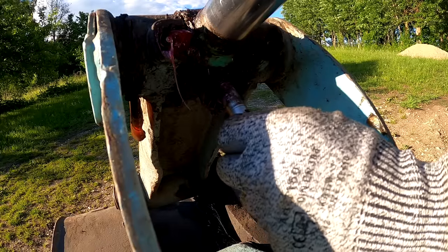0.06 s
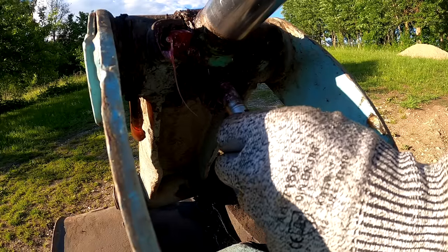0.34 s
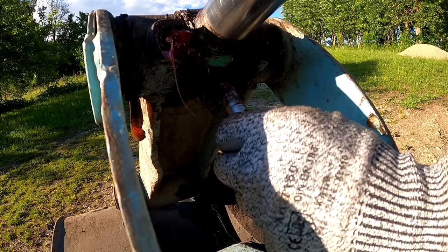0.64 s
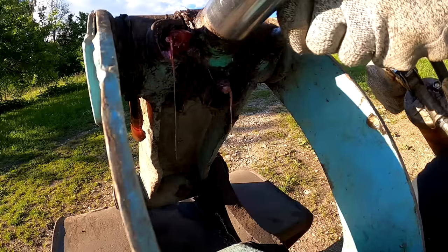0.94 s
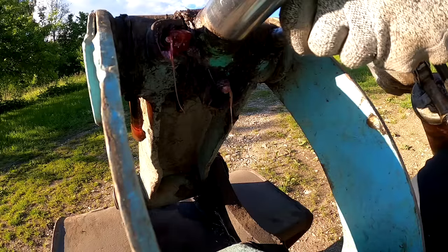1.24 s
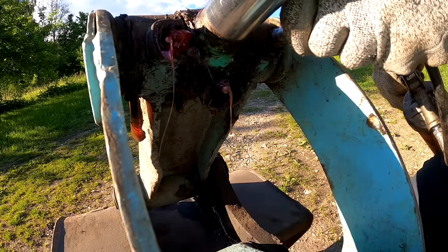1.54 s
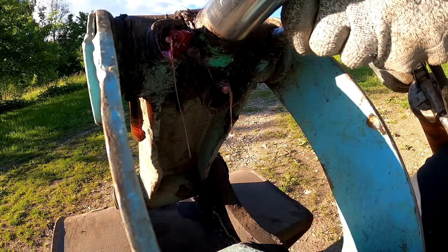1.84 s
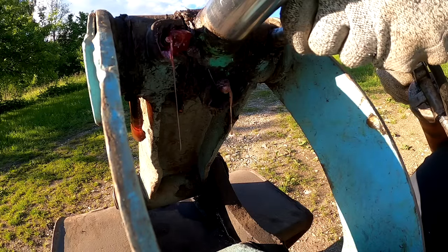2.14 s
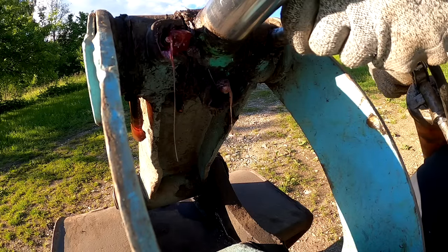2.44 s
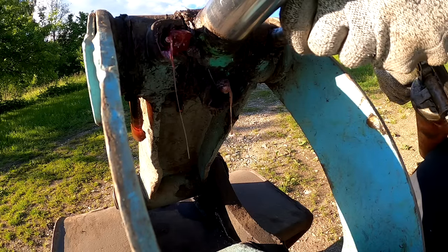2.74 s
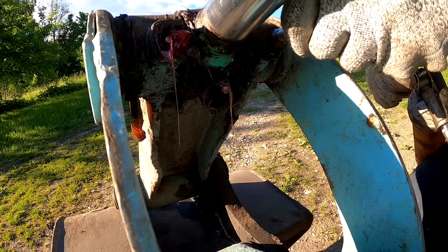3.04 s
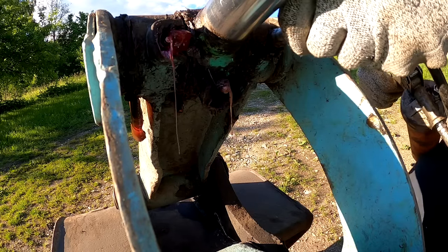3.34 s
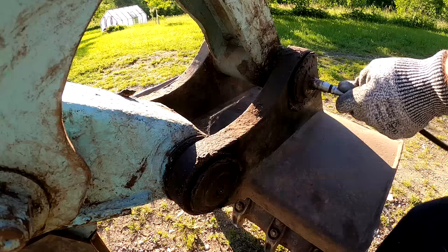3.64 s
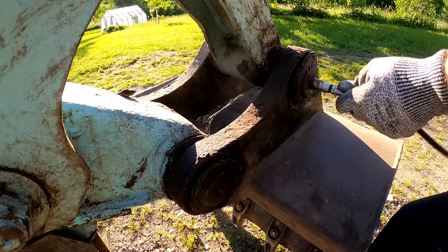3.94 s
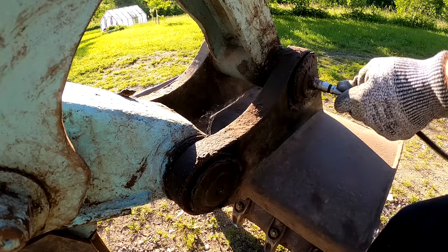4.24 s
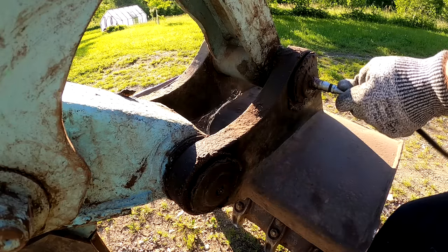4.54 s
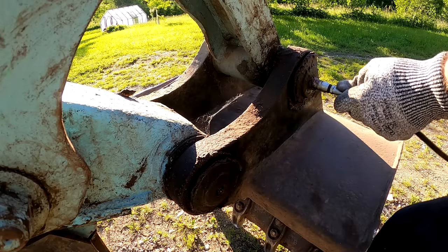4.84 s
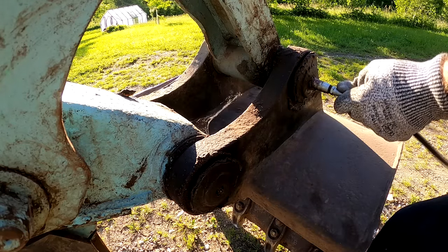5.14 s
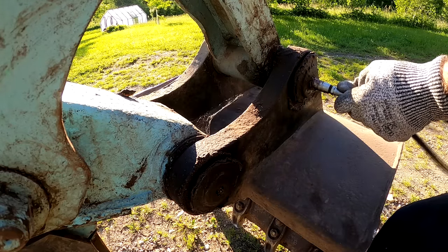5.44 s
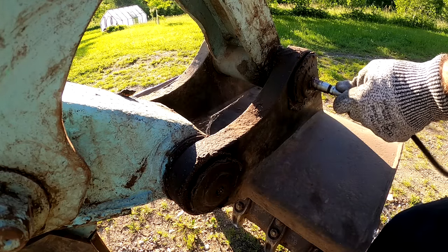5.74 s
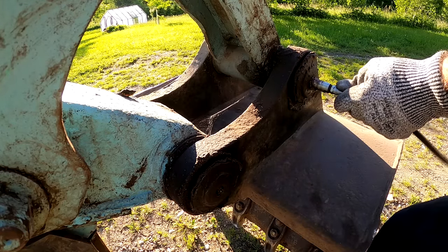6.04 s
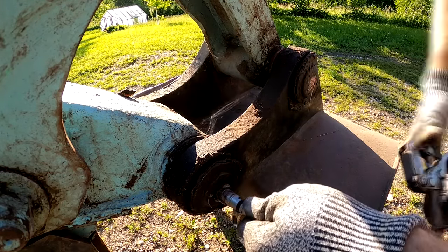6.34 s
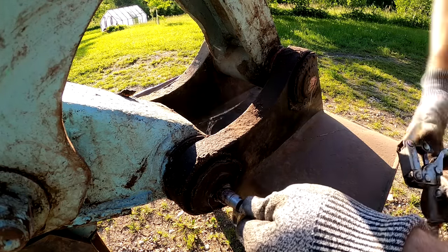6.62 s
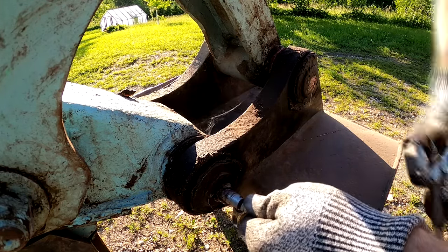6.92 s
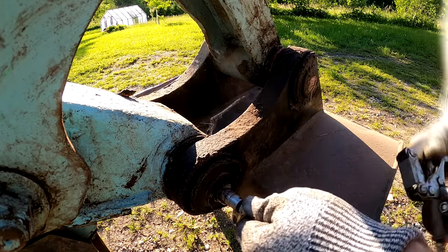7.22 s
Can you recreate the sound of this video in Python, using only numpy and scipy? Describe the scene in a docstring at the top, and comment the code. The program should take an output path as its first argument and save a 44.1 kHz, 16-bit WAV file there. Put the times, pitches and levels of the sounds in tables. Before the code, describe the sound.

Close metallic clicks of a pumped grease gun speed up, while birds trill in the trees and a breeze softly thumps the microphone.

```python
"""Outdoors beside a digger arm, light wind buffets the microphone over a faint rustle of leaves. Close by, a
grease gun's coupler knocks, its hose and a knit glove rub, and slow strokes begin, lever and piston clacking
and ringing the steel. From the trees a bunting sings a row of trilled notes and one long buzz. The strokes turn
quick and a second bunting sings from farther off. Another distant bird twitters, a low thump lands on the
microphone, and the far bunting sings once more."""
import sys
import numpy as np
from scipy import signal
from scipy.fft import rfft, irfft, next_fast_len
from scipy.io import wavfile
from scipy.ndimage import uniform_filter1d, map_coordinates

SR = 44100
rng = np.random.default_rng(int(sys.argv[2]) if len(sys.argv) > 2 else 0)


def waveform_to_disk(signal):
    """Save audio, clipped to [-1, 1], as 16-bit WAV at the path in sys.argv[1]."""
    frames = np.transpose(np.atleast_2d(signal))
    scaled = np.clip(frames, -1, 1) * 32767
    samples = np.round(scaled).astype(np.int16)
    wavfile.write(sys.argv[1], SR, samples)


N = 321048

# The breeze on the microphone. Each row: time in seconds, buffet level in dB.
BREEZE_LEVELS = [(0, -68), (0.8, -57), (1.55, -55.5), (1.9, -63), (2.15, -52), (2.4, -60.5), (2.6, -52.5),
                 (3.1, -55), (3.66, -54), (3.76, -74.5), (6.3, -75), (6.42, -54.5), (7.28, -61)]
# Low thumps on the microphone, from a gust or a bump of the camera. Each row: peak time in seconds,
# deep buffet in dB, lean to the left in dB (scaled by PAN_SHARE), the thump's upper part in dB.
LOW_THUMPS = [(0.869, -48, 1, -63), (1.477, -43.5, -17, -68), (1.599, -42, -19, -60),
              (2.527, -50.5, -8.5, -63), (3.039, -43, -4, -61), (3.158, -44, -9, -63),
              (3.618, -34.5, -16, -44.5), (3.659, -42, -1, -49), (4.999, -52, 3, -63), (6.376, -29, 2, -43),
              (6.579, -46, 6, -51.5), (6.799, -48, 11, -63.5), (6.965, -42.5, 14, -51),
              (7.084, -42, 20, -52.5)]
THUMP_RISE_S, THUMP_FALL_S, PAN_SHARE = 0.019, 0.027, 0.64
# The air all around. Each row: time in seconds, low rush in dB, leaves in dB.
AIR_LEVELS = [(0.0, -63.5, -65.5), (0.56, -64.5, -67), (0.97, -65, -70), (1.32, -57.5, -65),
              (1.84, -65.5, -67.5), (2.21, -61.5, -65), (2.66, -61.5, -62.5), (3.0, -62.5, -65.5),
              (3.57, -63, -67.5), (3.85, -68.5, -71.5), (5.07, -71, -71), (5.52, -71, -72.5),
              (6.2, -69.5, -65.5), (6.37, -67, -72), (7.02, -70, -74.5), (7.28, -71.5, -74)]
# Deep buffet, a thump's upper part, low rush and leaves. Each row: frequency in Hz, noise density in dB.
BUFFET_SPECTRUM = [(10, -6.5), (28, 2.5), (55, 0), (85, -7.5), (130, -16), (200, -26.5), (300, -33),
                   (900, -96.5)]
THUMP_SPECTRUM = [(60, -15), (120, 3.5), (200, -8.5), (350, -23.5), (900, -72)]
RUSH_SPECTRUM = [(40, -12), (130, -1), (220, 1), (330, -5), (500, -14.5), (800, -21.5), (2000, -67)]
LEAF_SPECTRUM = [(250, -24.5), (550, -7.5), (800, -11.5), (1150, 0.5), (1600, -2), (2050, 1), (2600, -2.5),
                 (4500, -3.5), (7300, -11.5), (8600, -20.5), (9900, -54), (13000, -60)]
# Stereo width of the leaves. Each row: frequency in Hz, left-right likeness from 0 to 1.
LEAF_LIKENESS = [(100, 0.24), (1500, 0.39), (3000, 0.6), (5000, 0.58), (9000, .1)]
# The echo from the trees. Each row: frequency in Hz, seconds to fall by 60 dB.
TREE_DECAY = [(300, 0.12), (2000, 0.17), (5000, 0.36), (10000, 0.11)]

# Modes of the gun, and of its hollow barrel under a soft press.
# Each row: frequency in Hz, width in Hz, strength in dB.
GUN_MODES = [(340, 71, -13), (670, 78, -22.5), (1050, 151, -4), (1435, 263, -4), (1664, 165, 1),
             (1997, 155, 3), (2385, 78, 2), (2613, 290, -3), (3300, 500, -1.5), (3773, 300, 3.5),
             (4130, 580, -3), (5130, 630, -3.5), (6580, 1480, -8.5), (8710, 1500, -7.5),
             (10700, 1100, -31.5)]
BARREL_MODES = [(1325, 65, 12), (1850, 130, 8), (2800, 400, -2)]
# Knocks of coupler and body. Each row: start in seconds, level in dB, thud and ring in dB above that.
COUPLER_KNOCKS = [(0.119, -59, -1, 7), (0.2685, -58.5, -3.5, -1.5), (0.4027, -62.5, -8, 4),
                  (0.702, -59.5, -1.5, 9), (1.3625, -49.5, -18, -11), (1.374, -52.5, -2, -2),
                  (1.432, -69, 5, 5.5), (1.622, -39.5, -6.5, 2.5), (2.126, -41.5, -9, -2.5),
                  (3.3522, -28, -8.5, -9), (3.361, -46, -5.5, 5.5), (3.4474, -52, -16, -3.5),
                  (3.6727, -49, 4.5, 0), (3.6784, -46, 1.5, -3.5), (6.388, -55.5, -1, -1),
                  (6.928, -45.5, -11, 1.5)]
EDGE_PER_RING = 1.27  # a contact's top edge grows faster than its steel ring
# The hose being pushed on, and two slides of the glove. Each row: time in seconds, level in dB.
HOSE_LEVELS = [(0.23, -67), (0.27, -55.5), (0.33, -61.5), (0.45, -68), (0.62, -64.5), (0.85, -70.5)]
GLOVE_SLIDES = [
    [(1.06, -73), (1.14, -64), (1.25, -78), (1.34, -63.5), (1.47, -79), (1.6, -68), (1.75, -68)],
    [(6.45, -85), (6.6, -67), (6.74, -64.5), (6.85, -72)],
]
# Rubbing rubber and rubbing knit. Each row: frequency in Hz, noise density in dB.
RUBBER_SPECTRUM = [(150, -50), (400, 3.5), (900, -7), (1600, 1), (1900, -8), (4000, -12), (8000, -55)]
KNIT_SPECTRUM = [(1500, -19), (3500, -5), (6000, 1.5), (7500, -8.5), (9500, -13), (10800, -41)]
# Slow, full strokes. Each row: closing time in seconds, level in dB, seconds until the rebound,
# its level in dB, seconds until the lever springs open, its level in dB.
SLOW_PUMPS = [(1.1773, -39.5, 0.017, -46.5, 0.24, -53), (1.7215, -42.5, 0.024, -56.5, 0.22, -55),
              (2.2346, -40.5, .0221, -50, .2418, -54.5), (2.773, -43.5, .0192, -45, .249, -54),
              (3.3291, -42, 0.027, -43.5, 0.26, -54.5)]
# The colour of each kind of contact: thud, ring and edge in dB above its level.
CLOSING, REBOUND, OPENING = (-10, 6.5, -4.5), (-14, 7.6, -32), (1.2, 10.3, -1.5)
PRESSING = (-16, -5.5, -33)

# The buzz closing each of the three bunting songs, near and far. Each row: time in seconds, level in dB.
BUZZ_PHRASES = [
    [(3.12, -71), (3.2, -55.5), (3.27, -50.5), (3.36, -57), (3.45, -59.5), (3.56, -59), (3.67, -78)],
    [(5.56, -77), (5.62, -69), (5.7, -75)],
    [(6.93, -62), (6.98, -69), (7.05, -89)],
]
# The wheeze in that buzz. Each row: frequency in Hz, noise density in dB.
WHEEZE_SPECTRUM = [(3800, -39), (4700, -27), (5200, 3.5), (5720, 9), (6400, 4), (6750, -27), (7600, -18),
                   (9000, -53)]
# The piston's soft double presses. Each row: start in seconds, first level in dB, second level in dB.
PISTON_PRESSES = [(3.8677, -55.5, -53), (3.997, -52.5, -52.5), (4.109, -57, -45.5), (4.38, -57.5, -55),
                  (4.5047, -79, -50.5), (4.664, -60.5, -54.5), (4.812, -56, -76), (4.96, -53.5, -58),
                  (5.109, -51.5, -56), (5.2511, -53, -63), (5.521, -56, -52.5), (5.8344, -47.5, -57),
                  (6.1582, -55.5, -50.5)]
# Double clacks of the quick strokes. Each row: start in seconds, first level in dB,
# seconds to the second clack, its level in dB, ring in dB for a clack of usual force.
QUICK_CLACKS = [(3.7502, -47.5, .012, -46, 2), (3.8975, -48, 0.0087, -50.5, -2),
                (4.137, -50.5, 0.014, -51.5, -0.5), (4.2526, -47.5, 0.015, -53.5, -4.5),
                (4.404, -52.5, .014, -59, 5.5), (4.534, -64.5, 0.015, -51, 5), (4.695, -81, .013, -55.5, 0),
                (4.8355, -54, 0.016, -39.5, 8), (4.9851, -58.5, 0.012, -56, 6),
                (5.132, -53, 0.012, -44.5, 0), (5.274, -47, 0.015, -50, 1),
                (5.55, -46.5, 0.011, -49.5, 2.5), (5.7004, -50, .015, -39, 3),
                (5.8591, -57, 0.014, -66, 3.5), (6.0177, -45, 0.013, -38.5, 2),
                (6.1857, -50, 0.013, -81, 5.5), (6.2207, -40.5, 0.014, -54, 3),
                (6.347, -85, 0.014, -55.5, 10), (6.5066, -59.5, 0.018, -87, 8.5),
                (6.634, -47.5, .0166, -48, 4.5), (6.7772, -56, 0.018, -76, 10.5),
                (6.906, -60, .015, -51, 6.5), (7.0496, -49.5, 0.013, -46.5, 5.5),
                (7.1913, -44.5, 0.0098, -45, 6)]
USUAL_DB, DULLING = -48, 0.37  # dB of ring lost for each dB that a clack is harder than usual
BOUNCE_ABOVE_DB, BOUNCE_S, BOUNCE_LOSS_DB = -42, .0125, 15.5  # the hardest clacks bounce once more
# The far bunting's two songs, and the other distant bird. Each row: time in seconds, level in dB.
FAR_PHRASES = [
    [(5.03, -85), (5.16, -67), (5.31, -65), (5.47, -64), (5.56, -64.5)],
    [(6.54, -76), (6.66, -69.5), (6.78, -62), (6.87, -64.5), (6.92, -71)],
]
TWITTER_LEVELS = [(5.89, -67), (5.93, -61), (6.08, -61.5), (6.22, -70), (6.31, -56.5), (6.35, -85)]


def amp(db):
    return 10 ** (np.asarray(db) / 20)


def unit(x):
    return x / np.sqrt(np.mean(x ** 2) + 1e-20)


def sine(hz):
    return np.sin(2 * np.pi * np.cumsum(hz) / SR)


def along(points, hz):
    """Interpolate (Hz, value) points on a log axis."""
    knots_hz, values = np.transpose(points)
    return np.interp(np.log(hz + 1), np.log(knots_hz + 1), values)


def curves(rows):
    """One value per sample for each column after the time."""
    s, *columns = np.transpose(rows)
    return [np.interp(np.arange(N) / SR, s, column) for column in columns]


def phrase(rows):
    """The gain of one (s, dB) curve, fading to silence outside it."""
    s, db = np.transpose(rows)
    return uniform_filter1d(amp(np.interp(np.arange(N) / SR, s, db, left=-140, right=-140)), size=900)


def wobble(rate):
    """A smooth random curve, rate knots a second."""
    return map_coordinates(rng.standard_normal(int(N * rate / SR) + 4), [np.arange(N) * rate / SR])


def filtered(x, response):
    """x through a complex frequency response."""
    size = next_fast_len(N + SR // 2)
    return irfft(rfft(x, size) * response(np.fft.rfftfreq(size, 1 / SR)), size)[..., :N]


def add(track, s, sound):
    """Mix a sound into a track from time s on."""
    start = max(0, round(s * SR))
    part = track[..., start:start + sound.shape[-1]]
    part += sound[..., :part.shape[-1]]


def placed(x, lag_ms, left_db):
    """A direction: the microphone's left port hears it lag_ms later and left_db louder than the right."""
    side = np.array([[1], [-1]]) / 2
    return filtered(x, lambda hz: amp(side * left_db) * np.exp(-2j * np.pi * hz * side * lag_ms / 1000))


def noise(spectrum, likeness, patchy_db):
    """Stereo noise of rms 1 with patches of random gain."""
    cells = signal.stft(rng.standard_normal((2, N)), nperseg=512)[2]
    patches = uniform_filter1d(rng.standard_normal(cells.shape[1:]), size=6, axis=0)
    patches = uniform_filter1d(patches, size=10, axis=1)
    pair = signal.istft(cells * amp(patchy_db * unit(patches)), nperseg=512)[1][:, :N]
    turn = lambda hz: np.arccos(np.clip(along(likeness, hz), -1, 1)) / 2
    mid, side = filtered(pair, lambda hz: amp(along(spectrum, hz)) * [np.cos(turn(hz)), np.sin(turn(hz))])
    return unit(np.array([mid + side, mid - side]))


def wind_and_thumps(flutter_db=3.5, flutter_rate=12):
    """A breeze flutters on the microphone; gusts or camera bumps thump it, harder at one port."""
    t = np.arange(N) / SR
    breeze_db, = curves(BREEZE_LEVELS)
    buffet, thump = amp(breeze_db + flutter_db * wobble(flutter_rate)), 0
    for s, db, left_db, upper_db in LOW_THUMPS:
        from_peak = (t - s) / np.where(t < s, THUMP_RISE_S, THUMP_FALL_S)
        swell = unit(amp([[PAN_SHARE * left_db], [0]])) / (1 + from_peak ** 2 / 4) ** 4
        buffet = buffet + amp(db - 3) * swell
        thump = thump + amp(upper_db + 0.5) * swell
    eddies = noise(BUFFET_SPECTRUM, likeness=[(50, 0.28)], patchy_db=2)
    eddies /= np.sqrt(uniform_filter1d(np.mean(eddies ** 2, axis=0), size=2600) + 1e-6)  # steady level
    thumps = thump * noise(THUMP_SPECTRUM, likeness=[(130, 0.24)], patchy_db=3.5)
    return amp(2.17) * buffet * eddies + thumps


def air_and_leaves():
    """Behind everything, the air rushes low and the leaves rustle with a fine grain."""
    rush_db, leaves_db = curves(AIR_LEVELS)
    rush = amp(rush_db + 3) * noise(RUSH_SPECTRUM, likeness=[(120, 1.0), (400, 0.32)], patchy_db=4)
    rustle = amp(leaves_db + 3 + 2.25 * wobble(31) + 0.52 * wobble(500))
    leaves = rustle * noise(LEAF_SPECTRUM, LEAF_LIKENESS, patchy_db=3)
    return rush + placed(leaves, lag_ms=0.049, left_db=2)


def knocks(edge_db=-18.5):
    """Contacts of the coupler and the gun's body, with less edge than the quick clacks."""
    return [(s, db, thud_db, ring_db, edge_db + EDGE_PER_RING * ring_db)
            for s, db, thud_db, ring_db in COUPLER_KNOCKS]


def resonances(modes, hz, detune, spread_db):
    """Damped modes; the grip shifts their pitch and strength from one contact to the next."""
    centre, width, db = np.transpose(modes)[:, :, None]
    mode_hz = centre * np.exp(detune * rng.standard_normal(centre.shape))
    polarity = (-1) ** np.arange(len(modes))[:, None]
    strength = polarity * amp(db + spread_db * rng.standard_normal(centre.shape))
    damping = 1j * hz * width
    return np.sum(strength * damping / (mode_hz ** 2 - hz ** 2 + damping), axis=0)


def grease_gun(snap_t60=0.0014, chatter_t60=0.051, hiss_rise_s=0.02, scatter_t60=0.029, size=4096):
    """Close by, each contact is a snap and a gritty chatter of loose parts, ringing the gun's modes."""
    t = (np.arange(size) - size // 8) / SR
    hz = np.fft.rfftfreq(size, 1 / SR)
    dying = lambda t60: amp(-60 * t.clip(0) / t60) * (t >= 0)
    # clack, thud, upper thud, steel ring, edge
    bands_hz = [(1200, 2600), (200, 720), (720, 1200), (2600, 6000), (6000, 11000)]
    filters = [signal.butter(5, band, "bandpass", fs=SR, output="sos") for band in bands_hz]
    bands = [signal.sosfreqz(sos, hz, fs=SR)[1] for sos in filters]
    # a faint hiss swells just before each clack, softening the attack, more so in quick strokes
    contacts = [(row, -26) for row in slow_strokes() + knocks()] + [(row, -16) for row in quick_strokes()]
    clacks = np.zeros((2, N))
    for (s, db, thud_db, ring_db, edge_db), hiss_db in contacts:
        hiss = amp(hiss_db + 60 * t.clip(None, 0) / hiss_rise_s) * (t < 0)
        chatter = amp(-17) * dying(chatter_t60)
        grit = amp(3.5 * np.repeat(rng.standard_normal(size // 64), 64))
        blow = 3.5 * (t == 0) + rng.standard_normal(size) * (dying(snap_t60) + grit * (hiss + chatter))
        # the digger's steel scatters the treble differently to each port
        scatter = rng.standard_normal((2, size)) * amp(-14) * dying(scatter_t60)
        force = rfft(blow) + rfft(scatter) * np.minimum(hz / 4000, 1.5)
        # a quiet contact with little edge is a soft press, which mostly rings the barrel
        soft = np.clip((-edge_db - 14) / 8, 0, 1) * np.clip((-db - 40) / 7, 0, 1)
        body = (1 - .7 * soft) * resonances(GUN_MODES, hz, detune=.022, spread_db=2.5)
        body += soft * resonances(BARREL_MODES, hz, detune=.01, spread_db=1)
        for band, band_db in zip(bands, [0, thud_db, thud_db - 1.8, ring_db, edge_db]):
            ringing = irfft(force * body * band)
            ringing /= np.sqrt(np.sum(ringing ** 2) / (0.02 * SR))  # equal energy in every band
            add(clacks, s + t[0] - .0004, amp(db + band_db) * ringing)
    gun = amp(-0.39) * placed(clacks, lag_ms=0.06, left_db=-1)
    return gun + amp(-27.5) * tree_echo(gun)


def tree_echo(x):
    """The trees scatter a short tail back to the microphone, different at each port."""
    hz, t, cells = signal.stft(rng.standard_normal((2, SR // 2)), SR, nperseg=256)
    tail = signal.istft(cells * amp(-60 * t / along(TREE_DECAY, hz)[:, None]), SR, nperseg=256)[1]
    return signal.fftconvolve(np.atleast_2d(x), tail / np.linalg.norm(tail[0]), axes=1)[:, :N]


def hose_and_glove():
    """Rubber rubs and knit fibres catch and slip near the microphone, with a fine, uneven grain."""
    knit = unit(amp(2.7 * wobble(1200)) * noise(KNIT_SPECTRUM, likeness=[(5000, 0.18)], patchy_db=4))
    rubber = unit(amp(3.5 * wobble(149.3)) * noise(RUBBER_SPECTRUM, likeness=[(1000, 0.65)], patchy_db=0))
    hose = placed(phrase(HOSE_LEVELS) * rubber, lag_ms=0.039, left_db=0)
    return hose + sum(map(phrase, GLOVE_SLIDES)) * knit


def slow_strokes():
    """Contacts of the lever as it closes, rebounds and springs open again."""
    rows = []
    for s, db, rebound_s, rebound_db, open_s, open_db in SLOW_PUMPS:
        rows += [(s, db, *CLOSING), (s + rebound_s, rebound_db, *REBOUND), (s + open_s, open_db, *OPENING)]
    return rows


def song_notes(start_s=1.644, gap_s=.1378, count=11, swell_s=1):
    """Evenly spaced notes swell to full voice. Each row: time in seconds, note in dB, slur in dB."""
    since = gap_s * np.arange(count)
    held_back = np.clip(1 - since / swell_s, 0, 1) ** 2
    return zip(start_s + since, -33.5 - 16.5 * held_back, -54 - 22.5 * held_back)


def near_bunting(pitch_hz=4885, scoop_hz=50, trill_hz=222, swing_hz=160, swell_s=0.01, fade_s=0.028,
                 slur_hz=7450, slur_drop_hz=2300, slur_rate=100):
    """In the near trees, high down-slurs lead into each note: a pure tone breaking into a fast trill."""
    t = np.arange(-SR // 10, SR // 5) / SR
    notes, slurs = np.zeros((2, N))
    for s, db, slur_db in song_notes():
        rasp, drift, waver = (wobble(rate)[:len(t)] for rate in (500, 90, 300))
        beat = 2 * np.pi * trill_hz * (t + np.cumsum(.1 * drift) / SR)
        trilling = np.clip(t / 0.002, 0, 1)
        scoop = scoop_hz * np.clip(-t / .02, 0, 1) ** 2
        hz = pitch_hz - scoop + trilling * (swing_hz * np.sin(beat) + 130 * rasp) + rng.normal(0, 28)
        decay_s = fade_s * np.exp(0.19 * rng.standard_normal())
        envelope = np.exp(-np.abs(t) / np.where(t < 0, swell_s, decay_s))
        pulsing = 1 - 1.02 * trilling * np.sin(beat / 2) ** 2
        add(notes, s + t[0], amp(db) * envelope * pulsing * sine(hz))
        fall = (slur_rate * (t + np.cumsum(.2 * drift) / SR) + rng.random()) % 1  # 0 to 1 in each slur
        falling_hz = slur_hz - slur_drop_hz * fall ** 2 + 150 * waver
        chain = np.sqrt(np.sin(np.pi * fall)) * (1 - 0.16 * fall) * sine(falling_hz)
        lead_in = np.exp(-((t + 0.05) / 0.023) ** 2)
        add(slurs, s + t[0], amp(slur_db) * lead_in * chain)
    # the camera body shades the highest tones from the right port
    song = placed(notes, lag_ms=-.005, left_db=1.5) + placed(slurs, lag_ms=-.007, left_db=7)
    return song + tree_echo(amp(-10) * notes + amp(-3) * slurs)


def bunting_buzz(pitch_hz=5735, wander_hz=45, rasp_hz=640, swing_hz=380):
    """Left of the microphone, each song closes on a wheezy, wavering tone with a very fast rasp."""
    hz = pitch_hz + wander_hz * wobble(250) + swing_hz * sine(rasp_hz + 130 * wobble(200))
    tone = unit(amp(0.93 * wobble(250)) * sine(hz))
    wheeze = noise(WHEEZE_SPECTRUM, likeness=[(5700, 0.57)], patchy_db=-5)
    song = sum(map(phrase, BUZZ_PHRASES)) * (amp(-1) * tone + amp(-5) * wheeze)
    return amp(-4) * placed(song, lag_ms=-.015, left_db=5.5) + amp(-9.5) * tree_echo(song)


def quick_strokes(press_gap_s=.0132, thud_db=-14.5, edge_db=-9.5):
    """Contacts of quick pumping: two soft presses, then a double clack, duller the harder it lands."""
    rows = []
    for s, first_db, second_db in PISTON_PRESSES:
        rows += [(s, first_db, *PRESSING), (s + press_gap_s, second_db, *PRESSING)]
    for s, first_db, gap_s, second_db, usual_ring_db in QUICK_CLACKS:
        clacks = [(s, first_db), (s + gap_s, second_db)]
        if second_db > BOUNCE_ABOVE_DB:
            clacks.append((s + gap_s + BOUNCE_S, second_db - BOUNCE_LOSS_DB))
        for when, db in clacks:
            ring_db = usual_ring_db - DULLING * (db - USUAL_DB)
            rows.append((when, db, thud_db, ring_db, edge_db + EDGE_PER_RING * ring_db))
    return rows


def far_bunting(pitch_hz=4890, note_rate=23, trill_hz=235, swing_hz=190):
    """From farther off the song is a quick, fluttering row of trilled notes, blurred by the trees."""
    t = np.arange(N) / SR
    hz = pitch_hz + swing_hz * np.sin(2 * np.pi * trill_hz * t) + 115 * wobble(400)
    pulsing = (1 + 0.82 * np.sin(2 * np.pi * note_rate * t)) * amp(2.3 * wobble(200))
    song = amp(7.5) * sum(map(phrase, FAR_PHRASES)) * unit(pulsing * sine(hz))
    return placed(song, lag_ms=0.058, left_db=0) + amp(-6.5) * tree_echo(song)


def twitter(pitch_hz=3750, sweep_hz=900, whistle_rate=27):
    """A second bird, far from the microphone, runs through quick rising whistles."""
    rise = (whistle_rate * np.arange(N) / SR + 0.32 * wobble(13)) % 1
    hz = pitch_hz + sweep_hz * (rise - .5) + 300 * wobble(30) + 260 * wobble(650)
    song = phrase(TWITTER_LEVELS) * unit(np.sin(np.pi * rise) * sine(hz))
    return amp(-7) * song + amp(-12.5) * tree_echo(song)


def scene():
    """At the microphone: the work close by, the birds in the trees, the wind all around."""
    birds = near_bunting() + far_bunting() + bunting_buzz() + twitter()
    return grease_gun() + hose_and_glove() + birds + wind_and_thumps() + air_and_leaves()


def record(dry, top_hz=13500):
    """The camera's microphone channel cuts off steeply above its band limit."""
    return filtered(dry, lambda hz: 1 / np.sqrt(1 + (hz / top_hz) ** 80))


dry = scene()
out = record(dry)
waveform_to_disk(out)
```